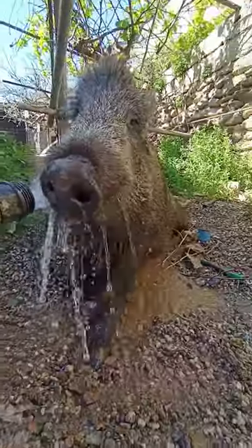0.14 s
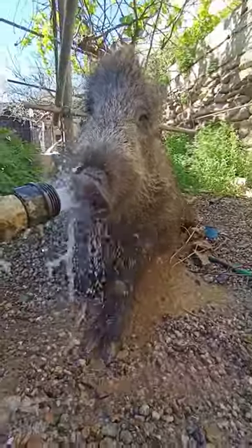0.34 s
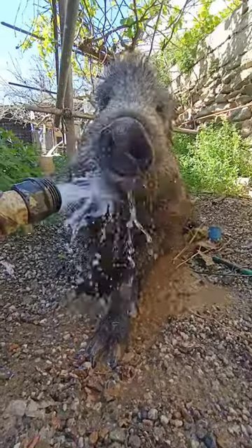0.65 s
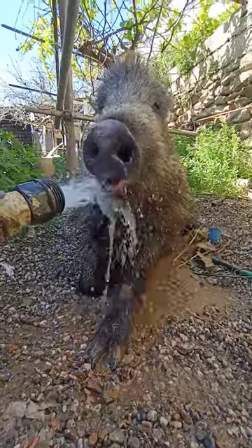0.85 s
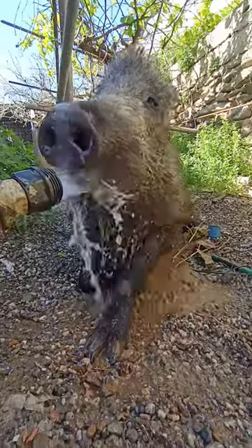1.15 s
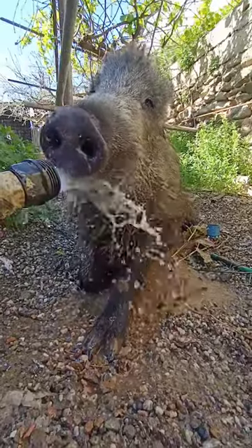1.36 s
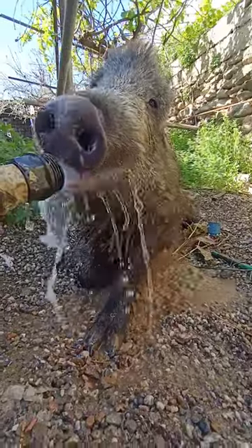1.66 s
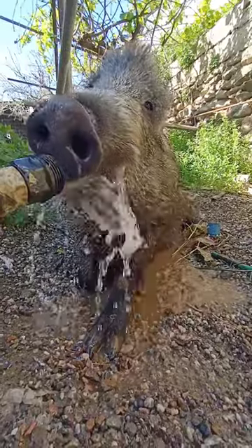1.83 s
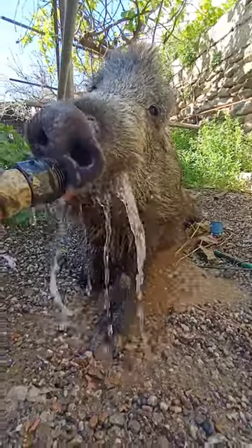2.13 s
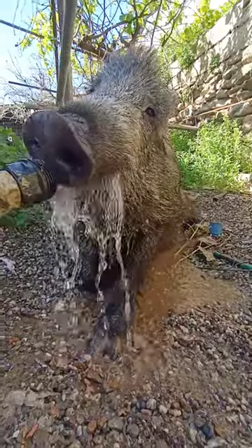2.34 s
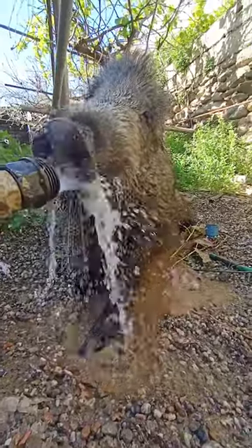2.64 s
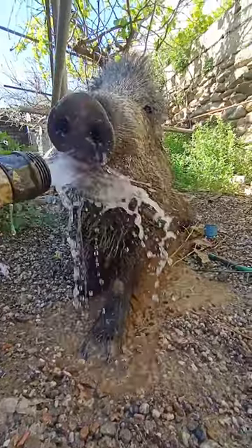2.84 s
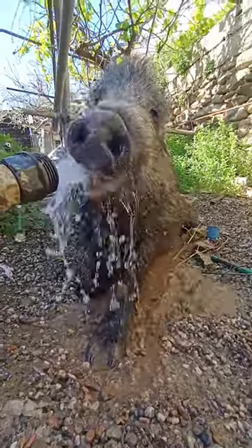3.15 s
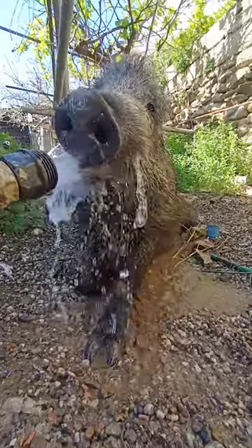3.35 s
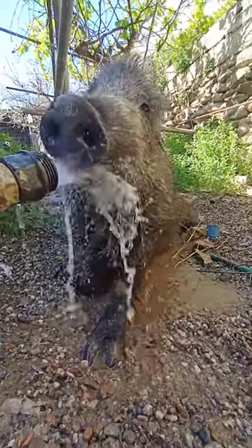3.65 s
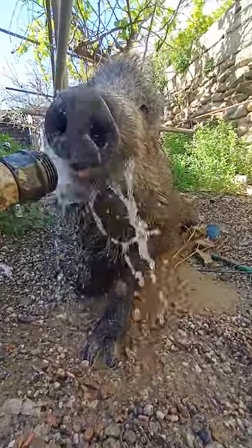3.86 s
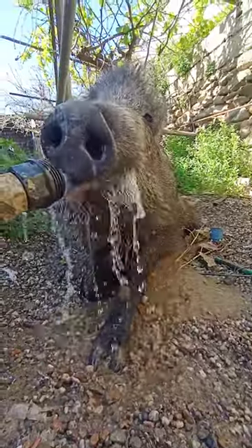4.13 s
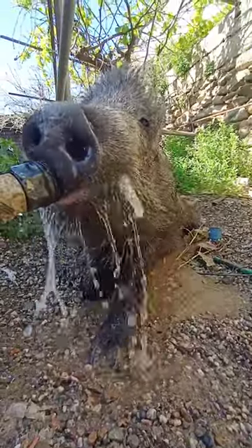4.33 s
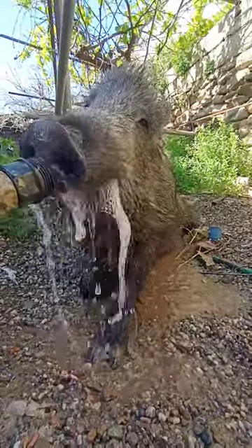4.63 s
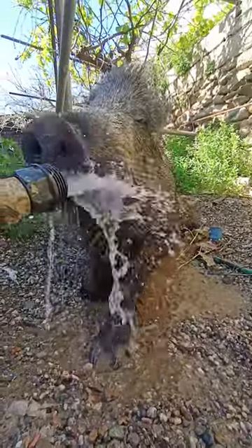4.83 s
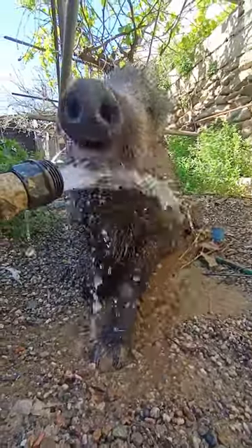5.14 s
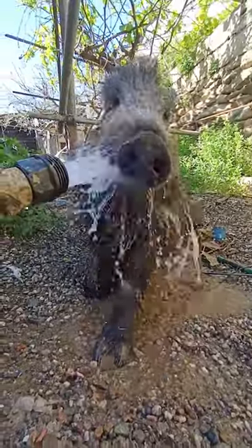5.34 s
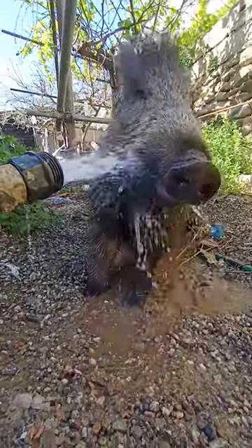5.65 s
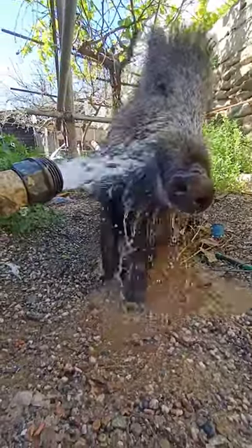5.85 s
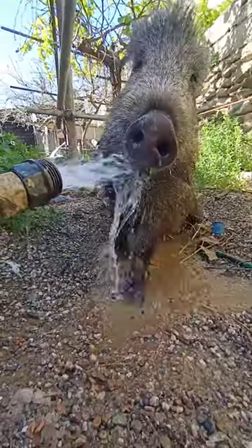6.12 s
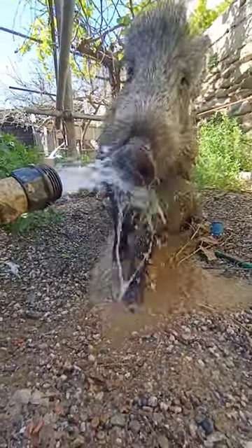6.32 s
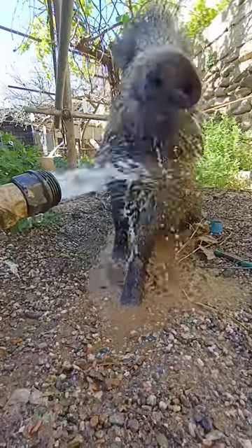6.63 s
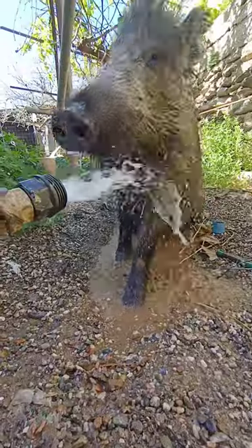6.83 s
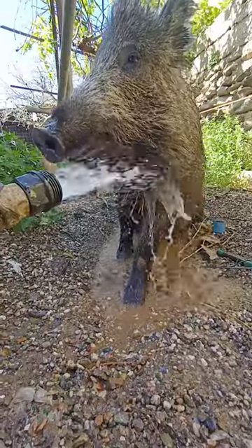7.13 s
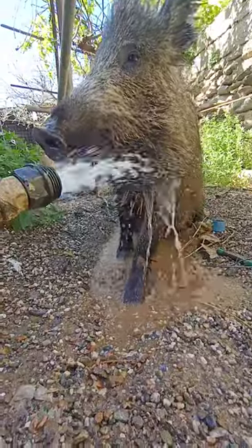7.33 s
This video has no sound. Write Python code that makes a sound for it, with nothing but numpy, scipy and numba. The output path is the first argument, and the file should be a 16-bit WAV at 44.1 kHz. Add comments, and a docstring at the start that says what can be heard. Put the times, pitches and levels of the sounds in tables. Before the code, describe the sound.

Steady bright water spray from a hose an arm's length away, crackling with fine drops on wet bristles and gravel. Irregular gulps, sloshes and hollow bubbles come from an animal's mouth. The nozzle's mid-pitched gush twice drops lower and chokes into gargling, then spurts open. The last two seconds are more open and splattery, with many short wet slaps. Stereo phone pickup, dry outdoors, with only a very faint low rumble beneath.

```python
"""In a gravel yard, a boar drinks from a running garden hose, an arm's length from a phone.
The spray is a crowd of drop clicks and tiny bubbles, pattering on bristles and wet gravel.
The nozzle is a splutter ringing a resonance, whose note sinks when the snout covers it.
Bubbles churn, gargle, plop and glug in the open mouth; heavy gobs slap down as short rings in a wet splat.
A faint rumble, dripping water, dull thuds and one hard click on the phone complete the scene."""
import sys
import numpy as np
from scipy import signal
from scipy.fft import rfft, irfft, next_fast_len
from scipy.io import wavfile
from scipy.ndimage import uniform_filter1d, map_coordinates
from numba import njit

SR = 44100
rng = np.random.default_rng(int(sys.argv[2]) if len(sys.argv) > 2 else 0)


def persist_wave(psi):
    """Save psi, clipped to +-1, as 16-bit WAV."""
    counts = np.round(np.clip(psi, -1, 1) * 32767).astype(np.int16)
    wavfile.write(sys.argv[1], SR, np.atleast_2d(counts).T)


N = 329858  # length in samples

# Share of the nozzle that the snout covers. Each row: time in seconds, share from 0 to 1.
COVER = [(1.1, 0), (1.75, .08), (1.93, .11), (2.04, .38), (2.12, .47), (2.18, .68), (2.28, .76),
         (2.35, .97), (2.53, .95), (2.58, .37), (2.65, .09), (4.34, .05), (4.4, .34), (4.55, .37),
         (4.72, .47), (4.79, .32), (4.85, .08), (5.3, 0)]
OPEN_HZ, SEALED_HZ = 1536, 705  # resonance of the nozzle's mouth, free and fully covered

# Colour of the spray. Each row: frequency in Hz, level in dB.
SPRAY_COLOUR = [(300, -28.5), (800, -18.5), (1250, -3.5), (1800, -12), (2600, 5), (3300, 1), (4100, -0.5),
                (5150, 2), (5450, -11.5), (6250, -6), (6600, -6.5), (8100, -25.5), (10000, -35),
                (15000, -36)]
# Steady parts of the spray with the nozzle free, in dB
SPLASH_DB, SIZZLE_DB, FINE_DB, PATTER_DB, MIST_DB = -34, -36, -38.5, -43.5, -56
# Change of the steady parts under cover, in dB: the patter on the gravel grows, the others sink
SIZZLE_COVER_DB, FINE_COVER_DB, GRAVEL_COVER_DB = -1.5, -0.5, 1.5
MIST_COVER_DB = -8  # the finest mist is only stopped by a tight seal
# Share covered at which the spray starts to change, and how much more it takes to change fully
MUFFLE_FROM, MUFFLE_SPAN = 0.021, 0.23
# The jet catches the snout and fans out. Each row: start in seconds, length in seconds,
# splash level in dB, level of the sizzle on the bristles in dB, level of the fine drops in dB.
SURGES = [(-0.1, 0.11, -20.5, -44, -31.5), (1.43, 0.44, -36.5, -33, -58), (2.535, 0.24, -32, -26.5, -36),
          (2.82, 0.38, -45, -36, -41), (3.0, 0.19, -33, -48, -46), (3.2, 0.17, -49, -33, -39),
          (3.87, 0.38, -35.5, -29, -42.5), (4.4, 0.14, -30.5, -32, -46), (4.75, 0.17, -31, -25.5, -35.5),
          (5.06, 0.5, -42, -31.5, -53), (5.54, 0.12, -19.5, -27, -35), (5.68, 0.26, -39, -32, -57),
          (6.5, 0.11, -28.5, -40, -53)]
SURGE_ATTACK_S, SURGE_RELEASE_S = 0.092, 0.035
# Thin spray overshoots onto the gravel. Each row: start in seconds, length in seconds,
# patter level in dB, mist level in dB.
SHOWERS = [(-0.06, 0.1, -33, -55), (0.2, 0.47, -33.5, -55.5), (0.34, 0.28, -43, -49.5),
           (0.49, 0.077, -29.5, -59), (0.72, 0.41, -36, -63), (1.15, 0.82, -47, -56.5),
           (2.62, 0.21, -33.5, -52.5), (2.85, 1.4, -40, -55), (4.79, 0.15, -37.5, -54.5),
           (5.59, 0.075, -34.5, -51), (5.77, 0.25, -41, -56), (6.41, 0.12, -35, -51),
           (7.36, 0.097, -38, -68)]
SHOWER_ATTACK_S, SHOWER_RELEASE_S = 0.048, 0.046
# Echo of the splash off the snout: typical lag, strength, wander of the lag (share), changes per second
SNOUT_LAG_S, SNOUT_ECHO, SNOUT_WANDER, SNOUT_PER_S = .0006, .36, .3, 6

# Steady splutter of the jet; more of it, relative to the sloshing, on each gulp while uncovered
JET_DB, JET_SLOSH_DB = -32.5, 7.5
# The held-back water bursts out past the snout. Each row: start in seconds, length in seconds, level in dB.
SPURTS = [(2.53, .1, -30), (4.36, 0.2, -34.5), (4.74, 0.038, -22)]
GUSH_WIDTH_HZ, GUSH_WIDENING_HZ = 570, 540  # width of the free gush, and how much cover can add
# Hollow ring of the hose end, peaks and dips. Each row: frequency in Hz, width in Hz, height in dB.
HOSE_MODES = [(1025, 91, 2), (1620, 52, 4), (1682, 220, -3.5), (1996, 180, 6), (3040, 320, 4),
              (5000, 140, -1.5), (6500, 37, 3)]

# The mouth fills and churns. Each row: start in seconds, length in seconds,
# level of the deep churning in dB, level of the sloshing in dB.
GULPS = [(0.215, 0.17, -43.5, -45), (0.35, 0.18, -53, -44), (0.555, 0.079, -51, -44),
         (0.69, 0.046, -48.5, -50), (0.785, 0.066, -45, -50), (1.59, 0.055, -46.5, -54),
         (1.645, 0.038, -57, -37.5), (1.79, 0.32, -58.5, -45.5), (2.31, 0.23, -42.5, -38.5),
         (2.57, 0.16, -50, -43), (2.74, 0.071, -46.5, -48.5), (2.85, 0.19, -52.5, -51),
         (3.32, 0.42, -56, -54), (3.9, 0.27, -53.5, -46), (4.19, 0.13, -58, -42.5),
         (4.375, 0.05, -60, -36.5), (4.6, 0.25, -47, -42), (4.86, 0.32, -54, -55),
         (5.51, 0.092, -53.5, -53), (5.61, 0.096, -52, -40.5), (6.712, 0.079, -45.5, -42.5),
         (6.81, 0.071, -44, -46.5)]
GULP_ATTACK_S, GULP_RELEASE_S = 0.0076, 0.015
DEEP_DB, SLOSH_DB = -66, -60  # churning between gulps
TRAPPED_DB = -42  # sloshing that full cover adds
RESTLESS_DB, RESTLESS_PER_S = 2.2, 28  # wavering of the churning between gulps
# Colour of the deep churning. Each row: frequency in Hz, level in dB.
CHURN_COLOUR = [(25, -42), (55, -46), (90, -10.5), (130, -2), (200, -3.5), (300, -3), (500, 2), (1200, -47)]
# Colour of the sloshing. Each row: frequency in Hz, level in dB.
SLOSH_COLOUR = [(120, -22), (260, -20), (390, -1.5), (560, 4), (760, 11), (1000, 8), (2000, -41)]

# Bands in which short splashes burst. Each row: low edge in Hz, high edge in Hz, level in dB.
SPLASHLETS = [(1900, 3000, -37), (2900, 4200, -38.5), (4000, 5300, -41), (6300, 6900, -48)]
# Faint low rumble of the yard. Each row: frequency in Hz, level in dB.
YARD_COLOUR = [(20, -24), (55, -22), (110, 4), (1000, -38)]
YARD_DB = -68.5

# Big bubbles glugging deep in the mouth. Each row: start in seconds, level in dB, starting pitch in Hz,
# time to fall by 60 dB in seconds (0.2 at most is used).
GLUGS = [(0.25, -35, 172, 0.1), (0.436, -42, 118, 0.15), (0.712, -39, 110, .09), (0.812, -35, 152, 0.12),
         (1.622, -33, 110, 0.085), (2.77, -36, 158, 0.11), (4.26, -42, 215, .08), (4.635, -33, 496, 0.1),
         (4.69, -34.5, 335, 0.12), (4.983, -39.5, 222, .15), (5.05, -38, 121, 0.18),
         (5.133, -38.5, 155, 0.13), (5.861, -44.5, 378, 0.18), (5.97, -44, 174, 0.11),
         (6.614, -44, 211, 0.23), (6.744, -36.5, 140, 0.12)]
# Air pockets closing in the mouth. Each row: start in seconds, relative level in dB,
# starting pitch in Hz, time to fall by 60 dB in seconds.
PLOPS = [(0.387, -26.5, 980, 0.06), (0.432, -27, 1160, 0.06), (0.562, -34, 549, 0.06),
         (0.71, -38, 433, 0.05), (0.87, -30.5, 735, 0.081), (1.656, -31, 870, 0.11),
         (1.793, -25.5, 370, 0.03), (2.384, -22, 737, 0.049), (3.337, -30.5, 512, 0.028),
         (3.42, -33.5, 690, 0.039), (4.205, -24.5, 947, 0.061), (4.387, -22.5, 740, 0.039),
         (4.739, -30, 770, 0.079), (4.769, -30, 409, 0.13), (5.087, -35.5, 985, 0.089),
         (5.523, -26, 750, 0.064), (6.09, -43.5, 794, 0.15), (6.579, -33.5, 810, 0.11),
         (6.666, -30, 1210, 0.064), (6.749, -25.5, 520, 0.03), (7.24, -36.5, 730, 0.069)]
# Gobs of water splatting down. Each row: time in seconds (heard about 1 ms later), level in dB,
# starting pitch in Hz, time to fall by 60 dB in seconds.
SLAPS = [(0.871, -14, 2680, 0.033), (0.881, -19, 2870, .028), (0.9383, -19, 2410, 0.015),
         (1.15, -17, 2320, 0.02), (1.2444, -13.5, 3930, .02), (1.5844, -18, 2820, 0.023),
         (2.0637, -20, 2720, 0.035), (2.0718, -21, 2750, .03), (2.2864, -13, 6000, 0.012),
         (2.355, -23, 2320, 0.022), (2.4999, -19.5, 2510, 0.027), (2.701, -18.5, 2650, 0.029),
         (3.1165, -17, 2510, 0.018), (3.295, -18, 5100, 0.022), (3.6316, -15.5, 5030, .02),
         (4.2294, -16, 3230, 0.018), (4.4372, -13, 4300, .012), (4.4388, -15, 2300, 0.012),
         (4.49, -19, 2940, 0.016), (4.894, -17, 2330, 0.024), (5.5715, -11.5, 2440, 0.02),
         (5.601, -15, 2400, .02), (5.648, -9.5, 2650, 0.035), (5.7352, -17, 2700, .025),
         (5.8252, -20.5, 2040, 0.045), (6.0514, -20, 3400, .016), (6.3112, -17.5, 2360, 0.023),
         (6.3315, -22, 2050, .018), (6.415, -19.5, 2180, 0.026), (6.477, -14, 5200, .008),
         (6.6646, -15.5, 2300, 0.036), (6.7314, -18, 3340, .02), (6.9024, -17, 3380, .014),
         (6.935, -23, 2450, .016), (7.0318, -18, 2080, 0.026), (7.15, -15, 3170, 0.028),
         (7.186, -19, 2780, 0.037), (7.2194, -18, 2700, 0.018), (7.2792, -18, 2170, 0.018),
         (7.32, -20, 2170, 0.032), (7.4067, -15, 2450, 0.017)]
GOB_TAIL_S, GOB_TAIL_DB = 0.0043, -6  # the rest of each gob lands a moment after its front
# Soft low thuds as the boar shifts its head. Each row: start in seconds, level in dB,
# pitch in Hz, time to fall by 60 dB in seconds.
THUDS = [(1.145, -48, 62, 0.18), (1.623, -40, 82, 0.11)]
# Water gargles at the back of the mouth. Each row: start in seconds, length in seconds,
# level in dB, middle pitch in Hz.
GARGLES = [(1.41, 0.29, -45.5, 740), (1.884, 0.59, -41, 750), (3.602, 0.41, -49.5, 786),
           (4.022, 0.23, -43.5, 760), (4.383, 0.38, -38, 986)]
GARGLE_WIDTH_HZ = 206
# The jet grazes the lips and hisses in a narrow band that moves with the head.
# Each row: start in seconds, length in seconds, level in dB, first pitch in Hz, last pitch in Hz.
GRAZES = [(2.8, .39, -35.5, 4900, 2300), (3.89, .32, -34, 3550, 3300), (5.01, .46, -33, 3650, 3400),
          (5.95, .33, -36.5, 3400, 3750)]
GRAZE_WIDTH_HZ = 420
# The jet squirts straight into the open mouth and rings it.
# Each row: start in seconds, length in seconds, level in dB.
SQUIRTS = [(2.85, 0.55, -36), (3.42, 0.76, -37), (7.0, 0.45, -38.5)]
CAVITY_HZ, CAVITY_WIDTH_HZ = 1940, 860
# One drop striking the phone. Each row: start in seconds, level on the left in dB,
# pitch in Hz, time to fall by 60 dB in seconds.
TICK = [(7.2054, -3, 2500, .0022)]

# The two microphone ports. Each row: frequency in Hz, lead of the left in radians,
# likeness of the two from 0 to 1, left minus right in dB.
PORTS = [(100, 0.2, 1, 2), (526, 0.55, 0.64, -2), (1010, 1.86, 0.36, 2), (1660, 2.45, 0.75, 2.5),
         (2050, 2.22, 0.37, 1), (2230, 2.98, 0.48, 2), (2890, 3.5, 0.57, -3.5), (3940, 4.64, 0.73, -1),
         (4420, 6.04, 0, -5.5), (5040, 7.85, 0.56, 1.5), (6660, 7.7, 0.7, -5), (7500, 7.74, 0, 0.5),
         (8600, 10.2, 0.35, -4), (13600, 10.6, 0.05, -11.5)]
# Where the head throws the splash. Each row: time in seconds, left minus right in dB.
SWAY = [(0.0, -0.5), (0.42, 2), (1.02, 0.5), (1.44, 4), (2.1, 0), (2.46, 0.5), (3.0, 1.5), (3.85, 2.5),
        (4.42, -1), (5.2, 1.5), (5.65, -0.5), (5.95, 1.3), (7.48, 2)]
TOP_HZ = 15550  # highest frequency the phone passes


def undb(db):
    """Decibels to gain."""
    return 10 ** (np.asarray(db) / 20)


def curves(table):
    """The columns of a time table, one value a sample."""
    s, *columns = np.transpose(table)
    return [np.interp(np.arange(N) / SR, s, column) for column in columns]


def bin_hz():
    """Frequency of every spectral bin."""
    return np.fft.rfftfreq(2 * next_fast_len(N // 2 + 1), 1 / SR)


def over_frequency(table):
    """The columns of a frequency table, one value a spectral bin."""
    hz, *columns = np.transpose(table)
    return [np.interp(np.log(bin_hz() + 1), np.log(hz), column) for column in columns]


def filtered(x, gain):
    """Apply one gain a spectral bin."""
    return irfft(rfft(x, 2 * (len(gain) - 1)) * gain)[..., :N]


def unit(x):
    """Scale to rms 1."""
    return x / np.sqrt(np.mean(x ** 2))


def colour(x, points):
    """Shape by (Hz, dB) points; rms 1."""
    return unit(filtered(x, undb(over_frequency(points)[0])))


def tinted(x, modes):
    """Raise or lower narrow bands given as (Hz, width, dB)."""
    hz = bin_hz()
    gain_db = sum(db * np.exp(-2 * ((hz - centre) / width) ** 2) for centre, width, db in modes)
    return filtered(x, undb(gain_db))


def band(x, lo_hz, hi_hz, order=3):
    """Keep only the sound between two frequencies."""
    edges = [lo_hz, min(hi_hz, SR / 2 - 1)]
    return signal.sosfilt(signal.butter(order, edges, "band", fs=SR, output="sos"), x)


def walk(rate):
    """Random levels, rate of them a second, joined by straight slopes; rms near 1."""
    k = max(int(SR / rate), 1)
    steps = np.repeat(rng.standard_normal(N // k + 1), k)
    return unit(uniform_filter1d(steps, k)[:N])


@njit
def resonate(x, hz, width):
    """Band-pass with a moving centre, gain 1 there."""
    y, b, l = np.empty(len(x)), 0., 0.
    for i in range(len(x)):
        g, k = np.tan(np.pi * hz[i] / SR), width / hz[i]
        v = (b + g * (x[i] - l)) / (1 + g * (g + k))
        b, l, y[i] = 2 * v - b, l + 2 * g * v, k * v
    return y


def resonate_twice(x, hz, width):
    """Two equal resonances in a row, for steeper sides; rms 1."""
    return unit(resonate(resonate(x, hz, float(width)), hz, float(width)))


@njit
def rings(s, hz, t60, size, glide):
    """Damped sines; glide makes the pitch rise, as when a bubble nears the surface."""
    y = np.zeros(N)
    for k in range(len(s)):
        start, length = int(s[k] * SR), t60[k] * SR
        # each sample multiplies z by p (turn and decay), and p itself by bend (pitch rise)
        z, p = size[k] + 0j, np.exp(2j * np.pi * hz[k] / SR - np.log(1000.) / length)
        bend = np.exp(2j * np.pi * hz[k] / SR * glide / length)
        for i in range(max(start, 0), min(start + int(length), N)):
            y[i] += z.imag
            z *= p
            p *= bend
    return y


def bubbles(count, lo_hz, hi_hz, cycles, spread_db, glide):
    """A random crowd of bubbles, many small and a few large; rms 1."""
    when, pitch, life, size = rng.random((count, 4)).T
    hz = lo_hz * (hi_hz / lo_hz) ** pitch
    size = undb(-spread_db * np.log(1 - .99 * size))
    return unit(rings(when * N / SR, hz, cycles * (.5 + life) / hz, size * np.sqrt(hz), glide))


def impacts(count, spread_db):
    """Random drop clicks, many small and a few large (the reverse if spread is negative); rms 1."""
    when, size, sign = rng.random((count, 3)).T
    size = undb(-spread_db * np.log(1 - .997 * size))
    return unit(np.bincount((when * N).astype(int), size * np.sign(sign - .5), N))


def clumps(count, decay_s):
    """Power envelope of random gobs, each landing at once and scattering; mean 1."""
    keep = np.exp(-1 / (decay_s * SR))
    power = signal.lfilter([1 - keep], [1, -keep], impacts(count=count, spread_db=2.0) ** 2)
    return power / np.mean(power)


def swells(table, attack_s, release_s):
    """Rows (s, length s, dB, ..) rise, hold and die away; one summed power envelope a dB column."""
    t, total = np.arange(N) / SR, 0
    for start, length, *db in table:
        rise = np.clip((t - start) / max(attack_s, 1 / SR), 0, 1) ** 2
        fall = np.exp(-np.maximum(t - start - length, 0) / max(release_s, 1 / SR))
        total = total + np.outer(undb(db) ** 2, rise * fall)
    return total


def on_top(steady_db, power):
    """Level in dB of a steady sound plus a power envelope."""
    return 10 * np.log10(undb(steady_db) ** 2 + power)


def cover():
    """Share of the nozzle that the snout covers."""
    return np.clip(curves(COVER)[0], 0, 1)


def nozzle_hz():
    """The nozzle's resonance sinks in step with the cover."""
    return OPEN_HZ + (SEALED_HZ - OPEN_HZ) * cover()


def mirrored(x):
    """The wet snout mirrors the splash; as the gap changes, hollow notches wander through the sound."""
    lag_s = SNOUT_LAG_S * np.exp(SNOUT_WANDER * walk(SNOUT_PER_S))
    echo = map_coordinates(x, [np.arange(N) - lag_s * SR], mode="mirror")
    return unit(x + SNOUT_ECHO * echo)


def shimmer(x, depth_db, rate, count=30):
    """Overlapping narrow bands swell and fade on their own as the splash changes shape."""
    centres = np.geomspace(1500, 7500, count)
    shares = over_frequency(np.column_stack([centres, np.eye(count)]))
    return sum(filtered(x, share) * undb(depth_db * walk(rate)) for share in shares)


def spray():
    """Drops tick and trap tiny bubbles, swelling in clumps as the jet breaks up; each band has its level."""
    covered = cover()
    muffled = np.clip((covered - MUFFLE_FROM) / MUFFLE_SPAN, 0, 1)
    splash, sizzle, drops = swells(SURGES, SURGE_ATTACK_S, SURGE_RELEASE_S)
    shower, haze = swells(SHOWERS, SHOWER_ATTACK_S, SHOWER_RELEASE_S)
    splash_db = on_top(SPLASH_DB, splash)
    sizzle_db = on_top(SIZZLE_DB + SIZZLE_COVER_DB * muffled, sizzle)
    fine_db = on_top(FINE_DB + FINE_COVER_DB * muffled, drops)
    patter_db = on_top(PATTER_DB + GRAVEL_COVER_DB * muffled, shower)
    mist_db = on_top(MIST_DB + MIST_COVER_DB * covered ** 2, haze)

    ticks = impacts(count=70000, spread_db=1.5)
    fizz = bubbles(count=17000, lo_hz=1296.0, hi_hz=7420, cycles=30, spread_db=2.5, glide=0.061)
    clumping = np.sqrt(1 + 0.18 * clumps(count=1100, decay_s=0.0096))
    flow = clumping * undb(1.0 * walk(110) + .5 * walk(13))
    water = colour((ticks + undb(-4.5) * fizz) * flow, SPRAY_COLOUR)
    water = shimmer(mirrored(water), depth_db=2.4, rate=18)

    coarse = unit(band(water, 126, 2920, order=6)) * undb(splash_db)
    # the sizzle on the bristles is broad; its upper skirt also grows with the patter on the gravel
    core = unit(band(water, 2980, 4160, order=6)) * undb(sizzle_db)
    skirt_db = on_top(sizzle_db - 4.5, undb(-4.5) ** 2 * shower)
    skirt = unit(band(water, 4250, 5190, order=8)) * undb(skirt_db)
    fine = unit(band(water, 6295, 9470, order=8)) * undb(fine_db)
    patter = unit(band(water, 5297, 6356, order=6)) * undb(patter_db)
    mist = unit(band(impacts(count=50000, spread_db=-1.0), 8200, 15500, order=5))
    mist = mist * undb(mist_db + 2.6 * walk(41))
    return coarse + core + skirt + fine + patter + mist


def nozzle():
    """Air and water ring the nozzle's mouth: a narrow note, a gush that cover broadens, a weak overtone."""
    _, sloshing = swells(GULPS, GULP_ATTACK_S, GULP_RELEASE_S)
    (spurt,) = swells(SPURTS, SURGE_ATTACK_S, SURGE_RELEASE_S)
    level_db = on_top(JET_DB, spurt + undb(JET_SLOSH_DB) ** 2 * sloshing * (1 - cover()))
    # under the snout the flow breaks into bubbling bursts
    bursts_db = 3.5 * cover() * walk(45)
    splutter = impacts(count=16000, spread_db=2.0) * undb(1.3 * walk(70) + bursts_db)
    hz = nozzle_hz() * np.exp(0.037 * walk(24))
    free = resonate_twice(splutter, hz, GUSH_WIDTH_HZ)
    choked = resonate_twice(splutter, hz, GUSH_WIDTH_HZ + GUSH_WIDENING_HZ)
    # fully choked from half cover on
    share = np.clip(2 * cover(), 0, 1)
    gush = (1 - share) * free + share * choked
    note = unit(resonate(free, 1.03 * hz, 83.0))
    overtone = unit(resonate(splutter, 1600 + 1.375 * hz, 180.0))
    return (unit(note + undb(2.0) * gush) + undb(-11.5) * overtone) * undb(level_db)


def mouth():
    """The jet folds air into the mouth: big slow bubbles, livelier sloshing above, both in a turbulent rush."""
    churning, sloshing = swells(GULPS, GULP_ATTACK_S, GULP_RELEASE_S)
    restless_db = RESTLESS_DB * walk(RESTLESS_PER_S)
    deep_db = on_top(DEEP_DB + restless_db, churning)
    trapped = (undb(TRAPPED_DB) * cover() ** 2) ** 2
    slosh_db = on_top(SLOSH_DB + restless_db, sloshing + trapped)
    rush = impacts(count=3000, spread_db=2.8)
    deep = bubbles(count=800, lo_hz=85, hi_hz=480, cycles=12, spread_db=1.3, glide=0.25)
    slosh = bubbles(count=1000, lo_hz=260, hi_hz=1131, cycles=30, spread_db=1.8, glide=0.3)
    deep = colour(deep, CHURN_COLOUR) + undb(-2) * colour(rush, CHURN_COLOUR)
    slosh = colour(slosh, SLOSH_COLOUR) + undb(-4.0) * colour(rush, SLOSH_COLOUR)
    return unit(deep) * undb(deep_db) + unit(slosh) * undb(slosh_db)


def dribble():
    """Water running off the chin drips into the puddle: lone bright plinks and small low burbles."""
    plinks = bubbles(count=110, lo_hz=1900, hi_hz=4500, cycles=70, spread_db=.5, glide=.15)
    burbles = bubbles(count=55, lo_hz=190, hi_hz=950, cycles=45, spread_db=0.5, glide=.2)
    return undb(-52.0) * band(plinks, 1700, 4900) + undb(-63) * band(burbles, 190, 1100)


def spatter():
    """Larger drops smack on wet bristles and stones and ring for a moment; cover makes them quieter."""
    smacks = bubbles(count=950, lo_hz=2300, hi_hz=5600, cycles=9, spread_db=3.5, glide=.05)
    plips = bubbles(count=380, lo_hz=1850, hi_hz=5100, cycles=120, spread_db=1.2, glide=0.04)
    smacks = undb(-38) * band(smacks, 1700, 6700, order=7)
    plips = undb(-35.5) * band(plips, 1350, 6500)
    return (smacks + plips) * undb(-7 * cover())


def splashlets():
    """Small gobs burst into a few milliseconds of droplets in each band; lone drops tick on the stones."""
    bursts = 0
    for lo_hz, hi_hz, db in SPLASHLETS:
        droplets = unit(band(impacts(count=25000, spread_db=1.5), lo_hz, hi_hz, order=5))
        bursts = bursts + droplets * np.sqrt(clumps(count=400, decay_s=.0026)) * undb(db)
    ticks = unit(band(impacts(count=900, spread_db=2.2), 2200, 5200, order=7)) * undb(-44)
    return (bursts + ticks) * undb(-6 * cover())


def yard():
    """A faint outdoor rumble that wavers."""
    return colour(rng.standard_normal(N), YARD_COLOUR) * undb(YARD_DB + 2 * walk(4.5))


def glugs():
    """Big bubbles boom briefly and rise a little in pitch."""
    s, db, hz, t60 = np.array(GLUGS, float).T.copy()
    return band(rings(s, hz, np.clip(t60, .03, .2), undb(db), 0.21), 95, 800, order=2)


def plops():
    """Each air pocket rings upward in pitch inside a short wet gush."""
    s, db, hz, t60 = np.array(PLOPS, float).T.copy()
    ring = band(rings(s, hz, t60, undb(db + 1.5), 0.052), 400, 1700, order=2)
    # noise that follows the loudness of the ring
    gush = np.abs(signal.hilbert(ring)) * unit(band(rng.standard_normal(N), 340, 1650, order=3))
    return ring + undb(-14.0) * gush


def slaps():
    """Each gob lands in two parts, briefly ringing bubbles inside a wet splat around the same pitch."""
    s, db, hz, t60 = np.array(SLAPS, float).T.copy()
    front = rings(s + 0.000975, hz, t60, undb(db), 0.044)
    rest = rings(s + 0.001084 + GOB_TAIL_S, 1.1 * hz, t60, undb(db - 2.5 + GOB_TAIL_DB), 0.25)
    ring = band(front + rest, 1600, 6900, order=8)
    (centre_hz,) = curves(np.column_stack([s, hz]))
    wet = unit(band(resonate(rng.standard_normal(N), centre_hz, 2000.0), 1134, 6100, order=8))
    return ring + undb(-5.0) * np.abs(signal.hilbert(ring)) * wet


def thuds():
    """Dull, quickly damped bumps."""
    s, db, hz, t60 = np.array(THUDS, float).T.copy()
    return band(rings(s, hz, t60, undb(db), 0.), 30, 180, order=2)


def gargle():
    """Bubbling water rings the back of the mouth on a low, wavering note."""
    (power,) = swells([row[:3] for row in GARGLES], GULP_ATTACK_S, GULP_RELEASE_S)
    points = []
    for s, length, _, pitch in GARGLES:
        points += [(s, pitch), (s + length, pitch)]
    (hz,) = curves(points)
    bubbling = impacts(count=3000, spread_db=1.0) * undb(2.1 * walk(45))
    hz = hz * np.exp(0.05 * walk(14))
    return resonate_twice(bubbling, hz, GARGLE_WIDTH_HZ) * np.sqrt(power)


def graze():
    """Fine drops ring the gap between the lips, whose pitch glides as the head turns."""
    (power,) = swells([row[:3] for row in GRAZES], SURGE_ATTACK_S, SURGE_RELEASE_S)
    points = []
    for s, length, _, first, last in GRAZES:
        points += [(s, first), (s + length, last)]
    (hz,) = curves(points)
    hz = hz * np.exp(0.014 * walk(22))
    drops = impacts(count=14000, spread_db=-2.0) * undb(1.9 * walk(70))
    return resonate_twice(drops, hz, GRAZE_WIDTH_HZ) * np.sqrt(power)


def cavity():
    """Splutter rings the hollow of the open mouth, above the nozzle's note."""
    (power,) = swells(SQUIRTS, SURGE_ATTACK_S, SURGE_RELEASE_S)
    splutter = impacts(count=9000, spread_db=1.0) * undb(1.1 * walk(50))
    hz = CAVITY_HZ * np.exp(0.04 * walk(12))
    return resonate_twice(splutter, hz, CAVITY_WIDTH_HZ) * np.sqrt(power)


def tick():
    """A drop on the phone's case: one hard click, nearer the right port."""
    s, db, hz, t60 = np.array(TICK, float).T.copy()
    click = band(rings(s, hz, t60, undb(db), 0.), 1150, 5500, order=3)
    return np.outer(undb([0, 3]), click)


def hose():
    """Jet, spray and their ringing at the mouth; the hose end rings hollow only while left open."""
    openness = np.clip((nozzle_hz() - 1050) / 350, 0, 1)
    water = spray() + nozzle() + cavity() + graze()
    return openness * tinted(water, HOSE_MODES) + (1 - openness) * water


def running_water():
    """All the water sounds that go on in crowds, from the jet to the small splashes."""
    return hose() + mouth() + gargle() + dribble() + spatter() + splashlets()


def scene():
    """Water off to the left reaches the left port first; the rest reaches the ports less alike."""
    lead, likeness, balance_db = over_frequency(PORTS)
    likeness = np.clip(likeness, 0, 1)
    (sway_db,) = curves(SWAY)
    # the shared part is added at both ports, the unlike part is added at one and subtracted at the other
    shared = filtered(running_water(), np.sqrt((1 + likeness) / 2)) + plops() + glugs() + thuds()
    unlike = filtered(running_water(), np.sqrt((1 - likeness) / 2))
    left = filtered(shared + unlike, undb(balance_db / 2)) * undb(sway_db / 2)
    # the turn of phase makes the right port hear later
    right_gain = undb(-balance_db / 2) * np.exp(-1j * lead)
    right = filtered(shared - unlike, right_gain) * undb(-sway_db / 2)
    # the gobs fall nearer the middle than the nozzle, so their lead is smaller
    gobs = slaps()
    left = left + gobs + yard()
    right = right + filtered(gobs, np.exp(-.5j * lead)) + yard()
    return np.array([left, right]) + tick()


def record(dry):
    """The phone cuts the top."""
    return signal.sosfilt(signal.ellip(10, .2, 80, TOP_HZ, fs=SR, output="sos"), dry)


dry = scene()
out = record(dry)
persist_wave(out)
```